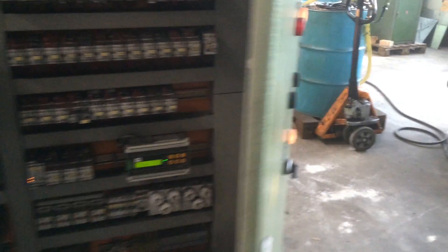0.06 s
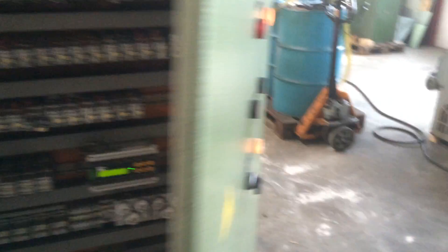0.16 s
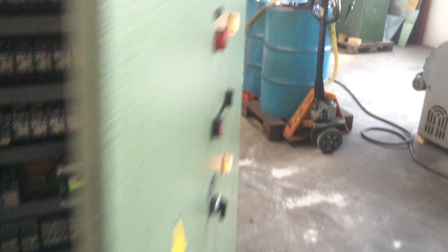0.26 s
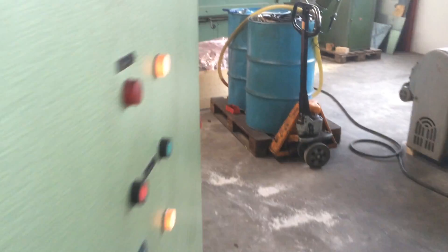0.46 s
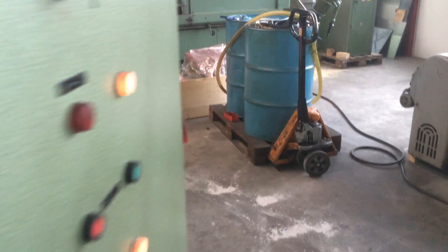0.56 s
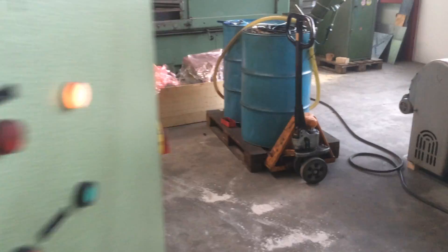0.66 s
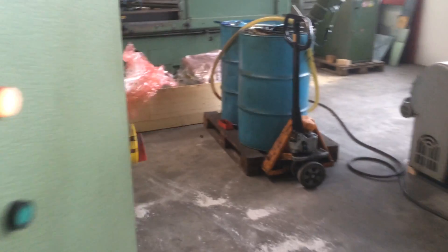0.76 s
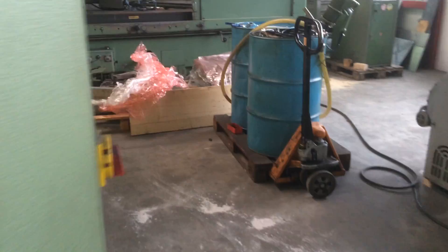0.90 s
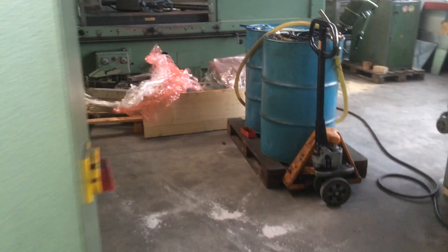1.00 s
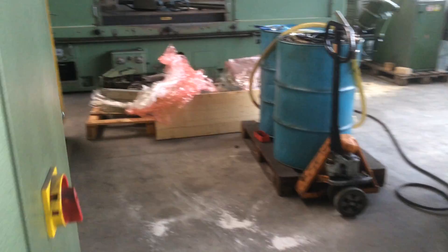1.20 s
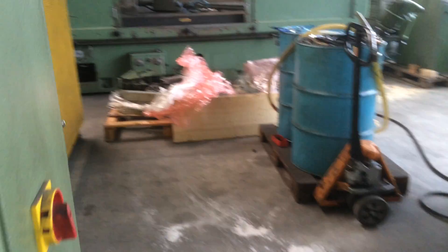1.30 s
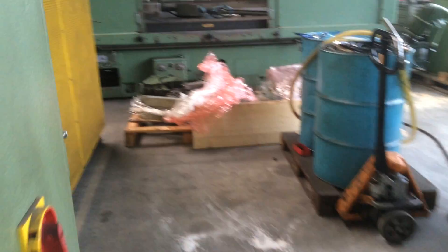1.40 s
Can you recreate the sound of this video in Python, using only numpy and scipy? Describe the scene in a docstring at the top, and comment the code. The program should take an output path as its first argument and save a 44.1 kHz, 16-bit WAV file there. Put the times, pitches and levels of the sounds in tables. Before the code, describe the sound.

Metal cabinet door clunks shut, a farther clack echoing through a workshop of running machinery.

```python
"""Steel cabinet door in a workshop

Close to the microphone, the door of a press brake's electrical cabinet is swung shut. Its edge
judders over the frame in a quick run of blows and the sheet booms. A second clack, further off,
rings through the hall. Machinery hums and rushes all the while; two soft bumps come at the end."""
import sys
import numpy as np
from scipy import signal
from scipy.fft import rfft, irfft
from scipy.io import wavfile

SR = 44100
rng = np.random.default_rng(int(sys.argv[2]) if len(sys.argv) > 2 else 0)


def pcm_store(signal):
    """Save signal as 16-bit PCM."""
    levels = np.round(np.clip(np.atleast_2d(signal), -1, 1) * 32767)
    wavfile.write(sys.argv[1], SR, levels.astype(np.int16).T)


N = 63945
T = np.arange(N) / SR
BINS = np.maximum(np.arange(N + 1) * SR / (2 * N), 1)

# edge on frame, close up: t/s, level/dB, dull above f/Hz, push on the sheet/dB, contact pitch f/Hz
DOOR_BLOWS = [(0.2196, -17.5, 8700, -19, 2440), (0.2247, -3, 8400, -23, 2150),
              (0.2287, 3.5, 7400, -15, 3940), (0.2332, -1.5, 7850, -1.5, 3360),
              (0.2368, 2, 11300, -1, 8030), (0.2441, 2.5, 15000, 0.5, 3610), (0.25, -5.5, 9000, -3, 2750),
              (.2535, 4, 8000, -5.5, 3985), (.2580, -3, 7000, -3.5, 3370), (0.265, -11, 9000, -6, 3600),
              (0.27, 4, 5000, -2, 3195), (.2750, -0.5, 4930, -1, 2600), (0.2809, -9.5, 14000, -2, 4900),
              (0.2851, 1.5, 14000, 5.5, 5900), (0.2882, -9, 7000, -1, 3170), (0.2936, -11, 5970, 4, 3030)]
# the door's echo in the hall: f/Hz, level/dB
DOOR_ECHO_SPECTRUM = [(400, 1), (900, -3), (1300, 5), (2000, 3.5), (4000, -3.5), (6000, -6), (10000, -13.5),
                      (15000, -23)]
def door():
    """The door swings on its hinge and judders over the frame; steel, cabinet and hall answer."""
    blows = [(s, db) for s, db, _, _, _ in DOOR_BLOWS]
    pushes = [(s, db) for s, _, _, db, _ in DOOR_BLOWS]
    near = hinge() + cabinet_boom() + contacts() + bright_ring(blows) + low_ring(pushes)
    return near + from_db(-51.5) * hall(DOOR_ECHO_SPECTRUM, blows)


# steel striking steel: f/Hz, level/dB
CONTACT_SPECTRUM = [(400, -1), (620, -10.5), (950, 0), (1300, -7.5), (1650, -3), (2000, 0.5), (2600, -3),
                    (3800, 1), (5000, -1.5), (6700, -4.5), (8000, -4.5), (10000, -5.5), (15000, -8)]
def contacts():
    """Each contact cracks with a short pitch of its own and rattles round the cabinet."""
    out = 0
    for s, db, dull_hz, _, hz in DOOR_BLOWS:
        crack = from_db(-5) * dying(s, t60=0.005)
        contact = from_db(-12) * dying(s, t60=0.018)
        rattle = from_db(-22.5) * dying(s, t60=0.11)
        burst = coloured(CONTACT_SPECTRUM) * np.sqrt(crack ** 2 + contact ** 2 + rattle ** 2)
        burst = signal.sosfilt(signal.butter(1, dull_hz, fs=SR, output="sos"), burst)
        ping = from_db(-9.5) * ring(s, hz, t60=0.013)
        out = out + from_db(db) * onset(s, rise_s=0.0003) * (burst + ping)
    return out


# bright, short metallic tones that colour each blow: f/Hz, level/dB, t60/s
BRIGHT_TONES = [(1034, -47.5, .15), (2080, -34.5, 0.14), (2842, -42, 0.14), (3054, -44, 0.06),
                (3690, -41, 0.11), (3770, -39, .13), (3959, -38, 0.074), (4320, -31, 0.048),
                (4450, -50, 0.05), (6020, -39.5, 0.088), (9070, -33, 0.062)]
def bright_ring(blows, scatter_db=2, max_delay_s=0.001012):
    """Short metallic tones colour every blow, each with its own strength and slight delay."""
    out = 0
    for s, db in blows:
        for hz, tone_db, t60 in BRIGHT_TONES:
            strength = from_db(db + tone_db + scatter_db * rng.standard_normal())
            polarity = rng.choice([-1, 1])
            out = out + strength * polarity * ring(s + max_delay_s * rng.random(), hz, t60)
    return out


# low ringing tones that colour the door's slam: f/Hz, level/dB, t60/s
LOW_TONES = [(61.5, -47, 0.066), (81.5, -41, 0.083), (147, -29.5, .12), (196, -27.5, 0.14),
             (199.4, -26, 0.16), (237, -32, 0.25), (275, -27.5, 0.086), (322.2, -29, 0.23),
             (375.5, -29.5, 0.27), (363, -42, 0.11)]
def low_ring(pushes, seated_s=0.2955):
    """Low tones ring with each push until the door seats and the frame damps it."""
    tones = sum(from_db(db + tone_db) * ring(s, hz, t60)
                for s, db in pushes for hz, tone_db, t60 in LOW_TONES)
    return tones * np.where(T < seated_s, 1, dying(seated_s, t60=0.12))


# hollow of the cabinet: f/Hz, level/dB
BOOM_SPECTRUM = [(30, -18), (62, -5), (85, -11), (110, 0), (145, -3.5), (175, 2.5), (198, 4.5), (225, 0.5),
                 (265, -11.5), (370, -13), (480, -19), (1500, -53), (6000, -80)]
# its swell and decay: t/s, level/dB
BOOM_ENVELOPE = [(0, -53), (.1, -49), (.16, -38.5), (.22, -38.5), (.26, -37), (.32, -27), (.42, -36),
                 (.5, -39), (.7, -51), (1.45, -93)]
def cabinet_boom():
    """The cabinet's hollow boom swells as the door swings and rings on after the blows."""
    return fader(BOOM_ENVELOPE) * coloured(BOOM_SPECTRUM)


# resonances of the hinge: f/Hz, level/dB, half-width/Hz
HINGE_RESONANCES = [(855, -44, 23), (1040, -53, 74), (2250, -50, 350)]
def hinge(peak_s=0.24, half_length_s=0.1):
    """The hinge rubs briefly in narrow bands of noise."""
    rub = sum(from_db(db) * resonant(hz, width) for hz, db, width in HINGE_RESONANCES)
    return rub * np.exp(-((T - peak_s) / half_length_s) ** 2)


def loose_part(s=0.342):
    """A loose part ticks faintly, with a high, beating ring."""
    tick = from_db(-38) * dying(s, t60=0.045) * coloured(CONTACT_SPECTRUM)
    ting = from_db(-49) * dying(s, t60=0.3) * resonant(hz=10800, width_hz=43)
    return tick + ting


# contacts of the second clack: t/s, level/dB
CLACK_HITS = [(0.5318, -9), (.5355, -5), (0.5391, -1), (0.5419, -6.5), (.549, -1), (0.577, -7.5),
              (0.591, -13), (.633, -21)]
# its colour at the microphone: f/Hz, level/dB
CLACK_SPECTRUM = [(50, -2), (130, 12), (220, 5), (350, -1), (700, -10.5), (1150, 1), (1600, -5),
                  (1930, 7.5), (2300, 2), (2800, 2), (3300, -1), (3900, 0), (5500, -4.5), (8000, -9),
                  (11500, -11), (15000, -18.5)]
def clack():
    """A few metal contacts further off, mostly heard through the hall."""
    direct = sum(from_db(db - 22.5) * dying(s, t60=0.053) * coloured(CLACK_SPECTRUM)
                 for s, db in CLACK_HITS)
    return direct + from_db(-34) * hall(CLACK_SPECTRUM, CLACK_HITS)


# dull bumps on the cabinet, under the clack and at the end: t/s, level/dB, f/Hz, t60/s
CABINET_BUMPS = [(.528, -14, 97, 0.028), (0.538, -23.5, 149.5, 0.1), (1.381, -20, 113, 0.053),
                 (1.416, -53, 128, 0.054), (1.441, -21, 125, 0.073)]
def bumps(echo_db=-23):
    """Soft blows of a few low cycles, each with a boom in the hall."""
    out = 0
    for s, db, hz, t60 in CABINET_BUMPS:
        thud = ring(s, hz, t60) * onset(s, rise_s=0.0012)
        echo_spectrum = [(hz / 4, -20), (hz, 0), (hz * 2, -8), (hz * 10, -50), (SR, -90)]
        out = out + from_db(db) * (thud + hall(echo_spectrum, [(s, echo_db)]))
    return out


# decay of the workshop hall: f/Hz, t60/s
HALL_DECAY = [(100, 0.93), (1000, 1.85), (2500, 1.53), (6000, 1.11), (15000, 1.43)]
def hall(spectrum, hits, build_s=0.0049):
    """Diffuse echo of some blows (t/s, level/dB); the midrange hangs on longest."""
    source, out = rfft(coloured(spectrum), 2 * N), 0
    edges_hz = np.geomspace(40, 17000, 13)
    for low, high in zip(edges_hz, edges_hz[1:]):
        t60 = at_hz(HALL_DECAY, np.sqrt(low * high))
        power = sum((from_db(db) * dying(s, t60) * onset(s, build_s)) ** 2 for s, db in hits)
        band = irfft(source * (BINS >= low) * (BINS < high))[:N]
        out = out + band * np.sqrt(power)
    return out


# airy rush of the machinery: f/Hz, level/dB
RUSH_SPECTRUM = [(200, 1), (330, 1), (600, 2), (850, 2), (1200, 4), (1600, 0), (2300, -0.5), (3000, -3),
                 (3500, -12.5), (5200, -11.5), (6100, -14), (7000, -8.5), (7700, -15.5), (8900, -11),
                 (10000, -18), (11300, -15.5), (12200, -22.5), (15000, -27)]
# it comes up after the clack: t/s, level/dB
RUSH_ENVELOPE = [(0, -63), (.51, -59), (.58, -41), (.85, -41.5), (.96, -38.5), (1.12, -42.5), (1.22, -42.5),
                 (1.29, -38), (1.34, -42.5), (1.39, -37), (1.45, -41)]
# low rumble of the machinery: f/Hz, level/dB
RUMBLE_SPECTRUM = [(25, -16), (50, -7), (90, 0), (190, 4), (250, -2.5), (350, -1.5), (520, -9.5),
                   (720, -4.5), (860, -2), (1200, -10), (2400, -12), (4000, -14.5), (8000, -30),
                   (15000, -44.5)]
# it sinks as the microphone turns away: t/s, level/dB
RUMBLE_ENVELOPE = [(0, -41), (.5, -44.5), (.85, -45), (1.15, -43), (1.45, -43.5)]
def machinery_noise():
    """Running machinery fills the workshop with a rush and a rumble."""
    rush = fader(RUSH_ENVELOPE) * coloured(RUSH_SPECTRUM)
    rumble = fader(RUMBLE_ENVELOPE) * coloured(RUMBLE_SPECTRUM)
    return rush + rumble


# tones of the machinery: f/Hz, level/dB
HUM_LINES = [(199, -60.5), (323, -50), (372, -57.5), (754, -61.5), (1254, -58), (1943, -63.5),
             (2331, -57.5)]
def machinery_hum(waver_hz=2.37, shaded_db=-6, clear_s=0.71):
    """Slightly wavering tones, fainter until the microphone has passed the door."""
    hum = 0
    for hz, db in HUM_LINES:
        pitch = hz + waver_hz * resonant(0, width_hz=13)
        cycles = np.cumsum(pitch) / SR + rng.random()
        hum = hum + from_db(db) * np.sqrt(2) * np.sin(2 * np.pi * cycles)
    return hum * fader([(0, shaded_db), (clear_s, 0)])


def from_db(db):
    """Decibels to gain."""
    return 10 ** (np.asarray(db) / 20)


def fader(points):
    """Gain that follows a table of t/s, level/dB."""
    return from_db(np.interp(T, *np.transpose(points)))


def at_hz(points, hz):
    """Read a table on a log-frequency axis."""
    freqs, values = np.transpose(points)
    return np.interp(np.log(hz), np.log(freqs), values)


def noise(gain):
    """Noise of rms one with the given gain at each frequency."""
    shaped = irfft(rfft(rng.standard_normal(2 * N)) * gain)[:N]
    return shaped / np.sqrt(np.mean(shaped ** 2) + 1e-20)


def coloured(spectrum):
    """Noise whose spectral density follows a table of f/Hz, level/dB."""
    return noise(from_db(at_hz(spectrum, BINS)))


def resonant(hz, width_hz):
    """Noise in one resonance, 6 dB down at width_hz to either side."""
    return noise(1 / (1 + ((BINS - hz) / width_hz) ** 2))


def onset(s, rise_s):
    """Envelope that rises to one after time s."""
    return -np.expm1(-np.maximum(T - s, 0) / rise_s)


def dying(s, t60):
    """Envelope that jumps to one at time s and falls 60 dB in t60 seconds."""
    return (T >= s) * from_db(-60 * np.clip((T - s) / t60, 0, 5))


def ring(s, hz, t60):
    """A sine struck at time s."""
    return dying(s, t60) * np.sin(2 * np.pi * hz * (T - s))


def scene():
    """One microphone by the cabinet, with the workshop behind."""
    return (door() + loose_part() + clack() + bumps() + machinery_hum() + machinery_noise())[None]


def record(dry, low_cut_hz=38, ceiling=0.58, high_cut_hz=15300):
    """The microphone chain thins the deep bass, rounds the peaks and cuts the top."""
    thinned = signal.sosfilt(signal.butter(3, low_cut_hz, "high", fs=SR, output="sos"), dry)
    rounded = ceiling * np.tanh(thinned / ceiling)
    return signal.sosfilt(signal.ellip(10, .1, 90, high_cut_hz, fs=SR, output="sos"), rounded)


dry = scene()
out = record(dry)
pcm_store(out)
```